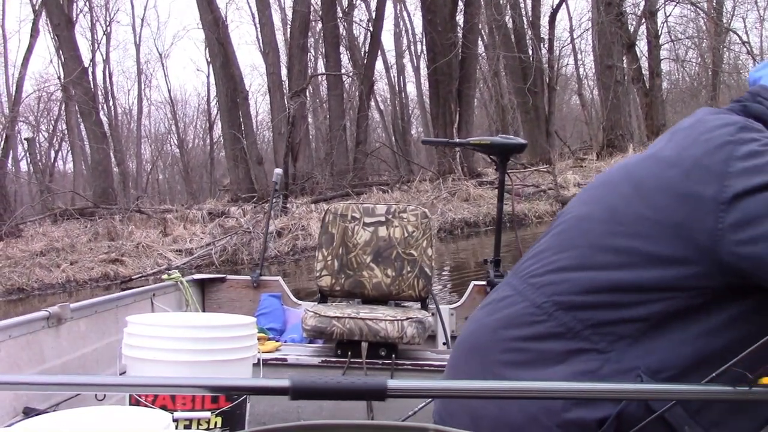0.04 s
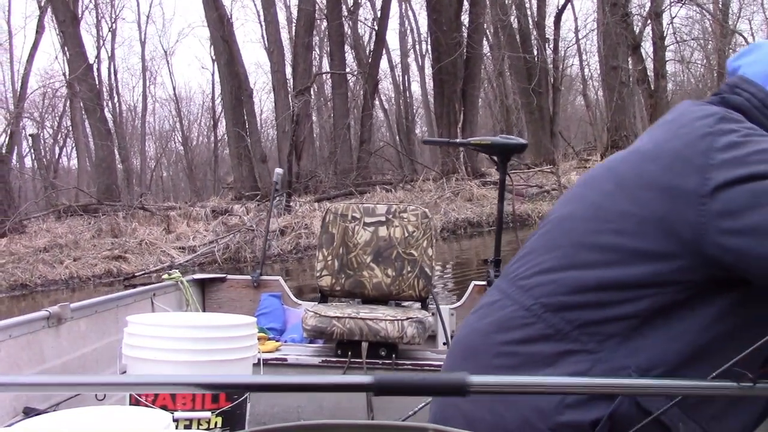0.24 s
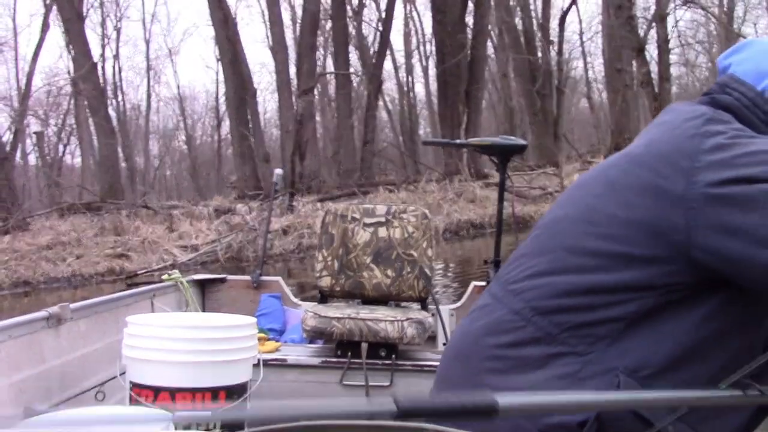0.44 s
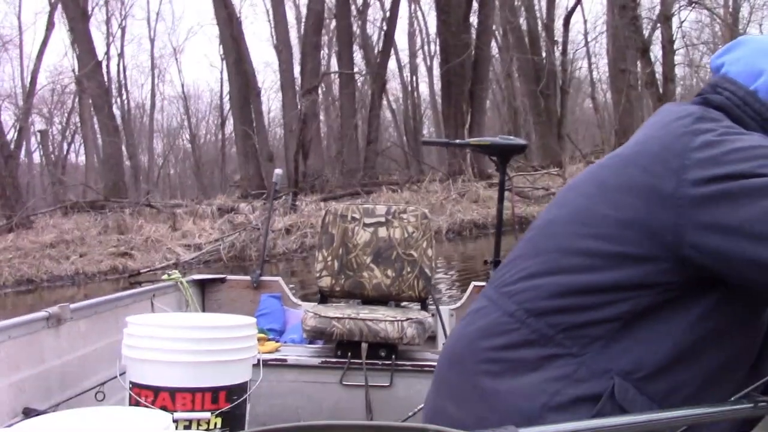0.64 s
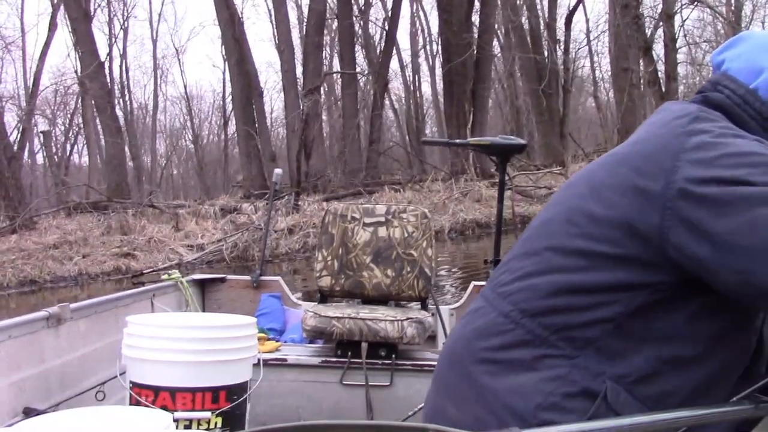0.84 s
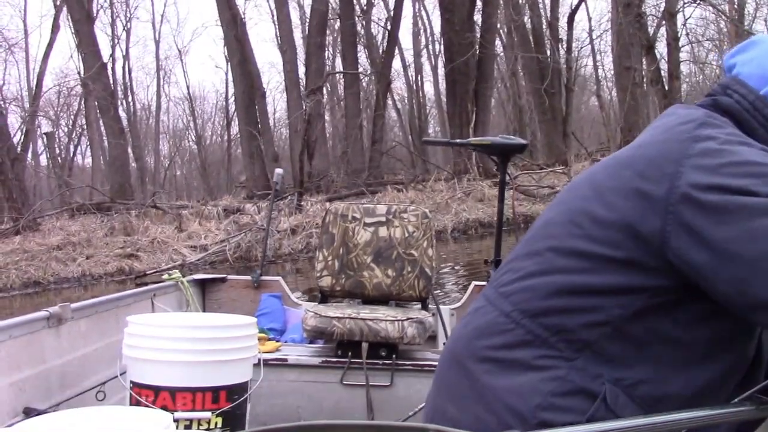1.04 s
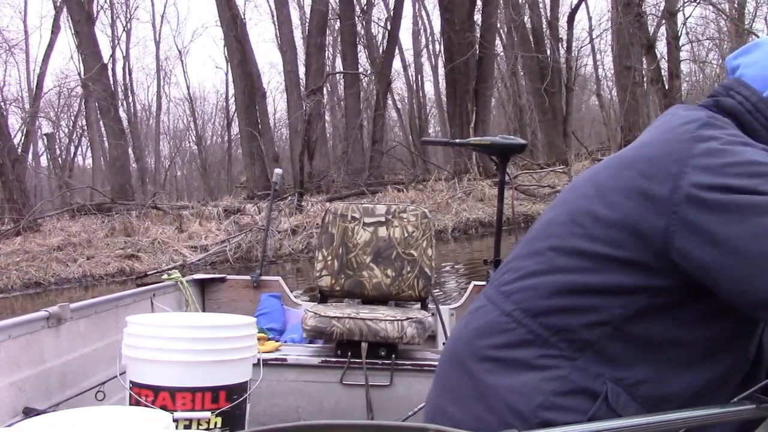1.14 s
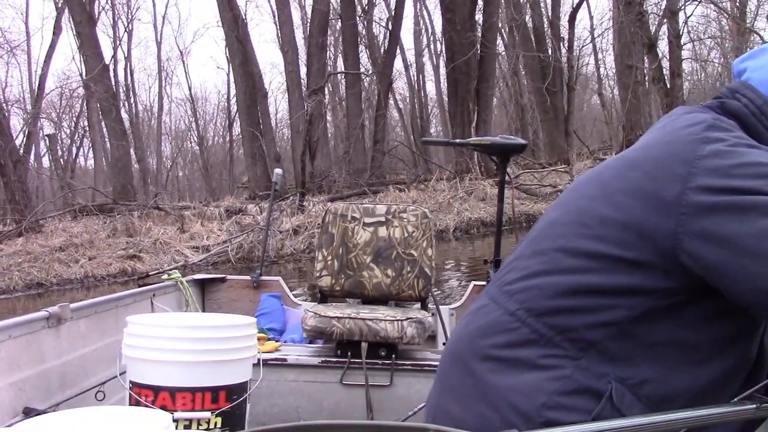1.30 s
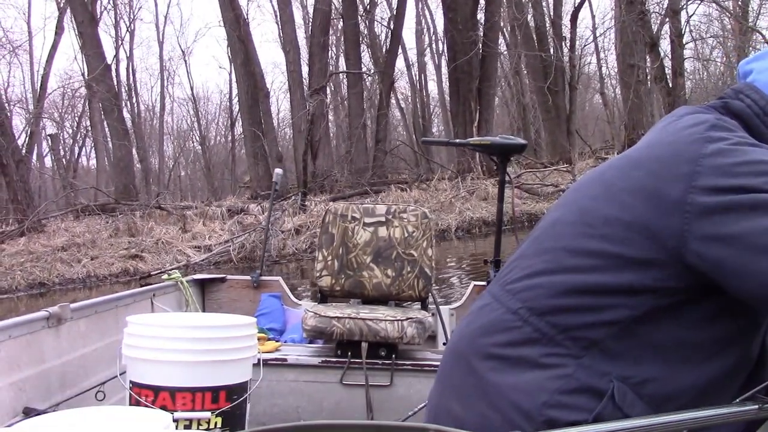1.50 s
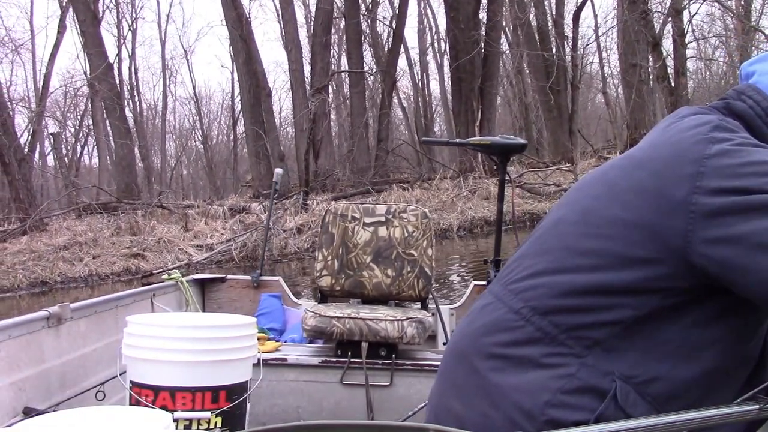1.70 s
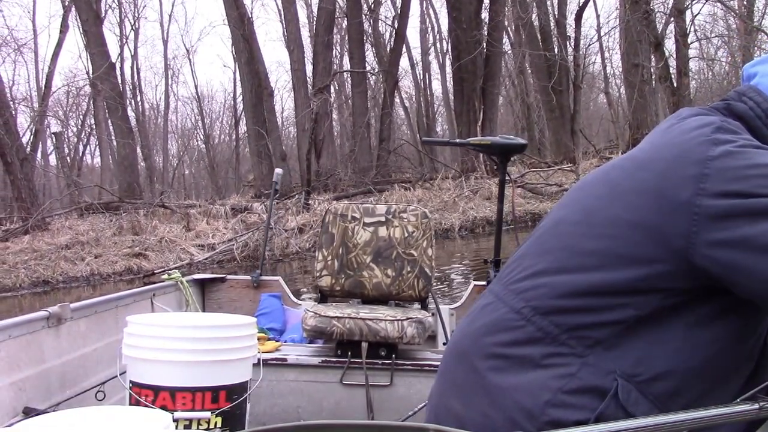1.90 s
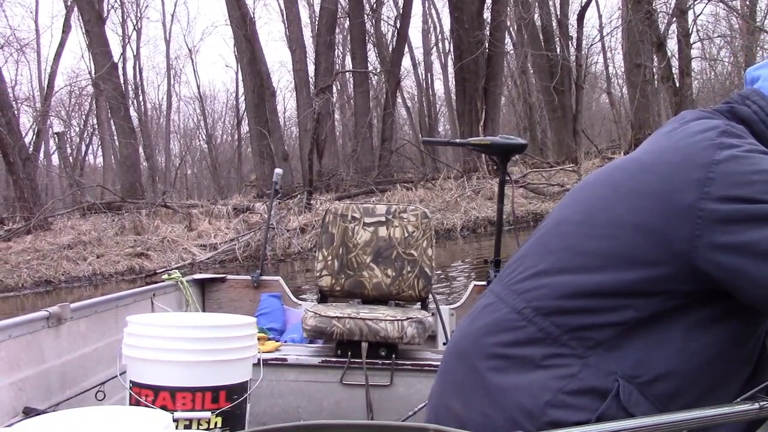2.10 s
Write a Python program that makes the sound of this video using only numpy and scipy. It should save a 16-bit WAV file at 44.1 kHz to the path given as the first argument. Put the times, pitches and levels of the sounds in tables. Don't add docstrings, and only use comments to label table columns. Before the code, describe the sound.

Loud hollow knocks and booming clunks as gear is dragged and dropped in an aluminum boat

```python
import sys
import numpy as np
from scipy import signal
from scipy.fft import rfft, irfft, next_fast_len
from scipy.io import wavfile
from scipy.ndimage import uniform_filter1d, minimum_filter1d

SR = 44100
rng = np.random.default_rng(int(sys.argv[2]) if len(sys.argv) > 2 else 0)


def store_wav(level_fs):
    pcm = np.round(np.clip(np.atleast_2d(level_fs), -1, 1) * 32767)
    wavfile.write(sys.argv[1], SR, pcm.T.astype(np.int16))


def volts(x):
    e = np.asarray(x, float) / 20
    return 10 ** e


N = 94815


def curve(table, hz):
    table = np.array(table, float)
    return np.interp(np.log(np.maximum(hz, 1)), np.log(table[:, 0]), table[:, 1])


def colour(x, table, lo_hz=0, hi_hz=SR):
    n = next_fast_len(len(x), real=True)
    hz = np.arange(n // 2 + 1) * SR / n
    gain = volts(curve(table, hz)) * (hz >= lo_hz) * (hz < hi_hz)
    return irfft(rfft(x, n) * gain, n)[:len(x)]


def unit(x):
    return x / np.sqrt(np.mean(x ** 2))


def grit(grit_db):
    grain = np.repeat(rng.exponential(size=N // 40 + 1), 40)[:N]
    return rng.standard_normal(N) * volts(grit_db * grain)


def strike(times_s, level_db, modes, rise_s, scatter_db, tilt_db=0, loose=1):
    hz, db, t60_s = np.array(modes, float).T
    luck = rng.random((len(times_s), 2, len(hz)))
    tilt = np.reshape(tilt_db, (-1, 1)) * np.log2(hz / 500)
    shape = volts(db + tilt + scatter_db * 3.1 * (luck[:, 0] - .5))
    shape *= (volts(level_db) / np.sqrt(np.sum(shape ** 2, axis=1) / 2))[:, None]
    phase = 2 * np.pi * loose * luck[:, 1]
    age_s = np.arange(int(SR * min(max(t60_s), 1))) / SR
    turn = 2 * np.pi * np.outer(hz, age_s)
    fade = np.exp(-np.log(1000) * np.outer(1 / t60_s, age_s))
    rings = (shape * np.cos(phase)) @ (fade * np.sin(turn))
    rings += (shape * np.sin(phase)) @ (fade * np.cos(turn))
    rings *= 1 - np.exp(-age_s / rise_s)
    out = np.zeros(N + len(age_s))
    for s, ring in zip(times_s, rings):
        start = int(s * SR)
        out[start:start + len(age_s)] += ring
    return out[:N]


def bursts(times_s, level_db, t60_s, table, rise_s, tilt_db, fades=0.34):
    noise = unit(colour(grit(0.76), table))
    age_s = np.arange(SR // 5) / SR
    rise = 1 - np.exp(-age_s / rise_s)
    out = np.zeros(N)
    for lo_hz in 500 * 2 ** (np.arange(11) / 2):
        power = np.zeros(N + len(age_s))
        band_db = level_db + tilt_db * np.log2(lo_hz / 2000)
        for s, db, t60 in zip(times_s, band_db, t60_s):
            start = int(s * SR)
            fall_db = 60 * age_s / t60 * (lo_hz / 2000) ** fades
            power[start:start + len(age_s)] += volts(2 * (db - fall_db)) * rise ** 2
        band = colour(noise, [(1, 0.0044), (2, 0)], lo_hz * (lo_hz > 500), np.sqrt(2) * lo_hz)
        out += np.sqrt(power[:N]) * band
    return out


def friction(table, spectrum, gain_db, grit_db):
    s, db = np.array(table, float).T
    level_db = np.interp(np.arange(N) / SR, s, db, left=-120, right=-120)
    return unit(colour(grit(grit_db), spectrum)) * volts(gain_db + level_db)


# frequency in Hz, level in dB.
WOOD_COLOUR = [(18, -52), (30, -34), (86, 1.5), (728, -5.5), (1690, -15.5), (2870, -15.5), (3360, -21.5),
               (11300, -33.5), (16300, -43)]


def wood():
    out = np.zeros((2, N))
    for lo_hz in 25 * 2. ** np.arange(10):
        mid, side = (colour(rng.standard_normal(N), WOOD_COLOUR, lo_hz, 2 * lo_hz) for _ in range(2))
        swell = unit(uniform_filter1d(rng.standard_normal(N), size=3000))
        width = min(0.2 + lo_hz / 4000, .9)
        out += volts(0.67 * swell) * (mid + width * side * np.array([[1], [-1]]))
    return unit(out) * volts(-53)


# start in seconds, length in seconds, first Hz, last Hz, level in dB.
BIRD_NOTES = [(.99, 0.083, 2200, 2170, -60), (1.35, 0.2, 625, 602, -58.5), (1.36, .02, 1880, 1940, -60),
              (1.378, 0.013, 2050, 2340, -57.5), (1.395, .05, 2730, 2850, -66),
              (1.44, 0.048, 2880, 2900, -67), (1.445, 0.028, 2430, 2450, -60),
              (1.485, 0.019, 2760, 2590, -54.5), (1.5, .015, 2550, 2300, -58),
              (1.505, 0.038, 2140, 2240, -56.5), (1.5, 0.048, 2890, 2920, -58.5),
              (1.525, 0.019, 2770, 2690, -54.5), (1.54, 0.075, 2370, 2436, -58), (1.6, .2, 2355, 2244, -68),
              (1.54, 0.13, 2830, 2840, -64.5), (1.62, 0.12, 2900, 2850, -63), (1.71, 0.12, 2850, 2870, -73),
              (1.945, .04, 2920, 2540, -63.5), (1.98, .11, 2480, 2520, -63),
              (2.095, 0.054, 2360, 2410, -56), (1.9, 0.18, 399.8, 394, -58)]
WHINE_SWELL_S = [.95, 1.35]


def birds():
    whine_hz, whine_db, overtone_db = 5570, -72.5, -11
    chirps_per_s, chirp_start_s = 7.7, 1.3
    t = np.arange(N) / SR
    waver = unit(uniform_filter1d(rng.standard_normal((2, N)), size=300))
    turn = 2 * np.pi * whine_hz * t + waver[1] / 2
    gate = np.clip(.5 + 2 * np.sin(2 * np.pi * chirps_per_s * (t - chirp_start_s)), 0, 1)
    gate *= np.interp(t, WHINE_SWELL_S, [0, 1])
    out = volts(whine_db + 2 * waver[0]) * gate * (np.sin(turn) + volts(overtone_db) * np.sin(2 * turn))
    for s, length_s, hz0, hz1, db in BIRD_NOTES:
        i = np.arange(int(s * SR), min(int((s + length_s) * SR), N))
        u = (i / SR - s) / length_s
        hz = (hz0 + (hz1 - hz0) * u) * (1 + 0.004 * waver[1, i])
        swell = np.abs(np.sin(np.pi * u)) ** 0.35
        out[i] += volts(db + 2.0 + 1.9 * waver[0, i]) * swell * np.sin(2 * np.pi * np.cumsum(hz) / SR)
    return out


# time in seconds, level in dB.
RUSTLE = [(.74, -90), (.78, -60), (.88, -67), (1.0, -73), (1.14, -64.5), (1.28, -71), (1.5, -73),
          (1.8, -78), (1.87, -67), (2.03, -67.5), (2.07, -60.5), (2.15, -69)]


def jacket():
    cloth = [(1500, -30), (2500, 5), (6000, 6), (8000, 5.5), (10000, -1), (14000, -33)]  # Hz, dB
    return friction(RUSTLE, cloth, 0, 1.3)


# time in seconds, level in dB.
ROCKING = [
    (1.0, -78),
    (1.08, -43),
    (1.25, -43.5),
    (1.45, -52),
    (1.62, -47),
    (1.75, -64),
]


def rocking():
    slosh = [(60, -13.0), (130, 5.5), (220, -4.0), (700, -14.0), (2000, -98.5)]  # Hz, dB
    return friction(ROCKING, slosh, 0, 0.54)


# time in seconds, level in dB.
DRAG = [(0, -55), (.095, -48), (.105, -45.5), (.17, -45), (.19, -40), (.21, -36.5), (.24, -38.5),
        (.27, -35), (.3, -42.5), (.34, -42), (.45, -54), (.56, -61.5)]
# frequency in Hz, level in dB.
SCRAPE_COLOUR = [(35, -32), (60, -4), (233, -0.5), (1860, -24), (8120, -35.5), (13000, -47), (16000, -57)]
# frequency in Hz, width in Hz, boost in dB.
POLE_MODES = [(476, 43, -6), (705, 135, 5), (1020, 37, 3), (1880, 27, 15), (2050, 43, -1), (2790, 80, 5),
              (3710, 44, -3), (5130, 220, 2.5), (5970, 120, 7), (6600, 150, 6.5), (8900, 880, -4)]


def drag():
    scrape = friction(DRAG, SCRAPE_COLOUR, 11.5, 1.0)
    out = scrape.copy()
    for hz, width_hz, db in POLE_MODES:
        b, a = signal.iirpeak(hz, hz / width_hz, fs=SR)
        out += volts(db) * signal.lfilter(b, a, scrape)
    return out


# start in seconds, level in dB, brightness in dB per octave.
TICKS = [(0.813, -30, -1), (0.897, -43, -1.5), (0.962, -28.5, 1), (1.046, -41.5, 1), (1.1123, -37.5, 0),
         (1.193, -43, -0.5), (1.2917, -54, -2), (1.348, -44.5, 0), (1.428, -44.5, 2), (1.5593, -42.5, 4),
         (1.5786, -43, 1.5), (1.6804, -57, 12), (1.7335, -49, -1), (1.8145, -53.5, -1), (1.894, -52, 8),
         (2.0535, -55, 0)]
# frequency in Hz, level in dB per Hz.
TICK_COLOUR = [(500, -23), (1000, 0), (1400, -4), (2400, -6.5), (3000, -20.5), (6000, -29), (9000, -36),
               (13000, -73)]


def rod():
    s, db, bright_db = np.array(TICKS, float).T
    return bursts(s, db, 0.058 + 0 * s, TICK_COLOUR, 0.0021, bright_db)


# start in seconds, level in dB, noise t60 in seconds, ring in dB,
# brightness in dB per octave.
CLINKS = [
    (0.6471, -28, 0.067, -9, 8.5),
    (.657, -8, 0.081, -15, 0),
    (0.6837, -18, 0.065, -22, 1.5),
    (0.723, -42, 0.19, -25, 2.5),
    (0.7338, -15.5, 0.078, -17, -0.5),
]
# frequency in Hz, level in dB per Hz.
CLINK_COLOUR = [(710, -8.5), (1200, -6.5), (3290, -6.5), (3620, -1.5), (3910, -6), (8000, -15.5),
                (9930, -13), (13000, -16.5), (16000, -53)]
# frequency in Hz, level in dB, t60 in seconds.
CLINK_RING = [(8500, -2, .1), (9670, -6, .085)]


def fitting():
    s, db, t60_s, ring_db, bright_db = np.array(CLINKS, float).T
    hz = 1500 * 6.5 ** ((np.arange(50) + rng.random(50)) / 50)
    jingle = np.c_[hz, curve(CLINK_COLOUR, hz) + 3 * np.log2(hz), 0.028 + 0 * hz]
    out = bursts(s, db, t60_s, CLINK_COLOUR, 0.0022, bright_db, .55)
    out += strike(s, db + ring_db, CLINK_RING, .0005, 0.86)
    return out + strike(s, db - 2.5, jingle, 0.00022, 2.8, bright_db)


KNOCK_S = [.2015, .321, .585, .9375, 1.0865]
# level in dB, hardness in dB per octave, t60 scale.
KNOCKS = [
    (-4, 7.5, 0.85),
    (-2, 0, 0.85),
    (-5, -14, 1.1),
    (-22, 5, 0.85),
    (-20, -5, 0.37),
]
# frequency in Hz, level in dB, t60 in seconds.
OBJECT_MODES = [(374, -6, 0.13), (484, 1.5, 0.065), (567, -4.5, 0.1), (684, 3, 0.055), (781, -1.5, 0.072),
                (980, -13, .05)]
THUD_S = [.94, .961]
THUD_DB = [-15, -14.5]
# frequency in Hz, level in dB, t60 in seconds.
THUD_MODES = [(132.5, 4.5, 0.25), (149.7, -4, 0.29)]


def knocks():
    out = strike(THUD_S, np.array(THUD_DB), THUD_MODES, 0.004, 0, loose=0)
    for s, (db, hard_db, scale) in zip(KNOCK_S, KNOCKS):
        modes = np.array(OBJECT_MODES) * [1, 1, scale]
        out += strike([s], np.array([db]), modes, 0.0013, 0, hard_db, loose=0)
    return out


# start in seconds, panel level in dB, boom level in dB,
# hardness in dB per octave.
BLOWS = [(0.201, -8.5, -26.5, 4), (0.233, -8.5, -46, 4), (0.322, -1, -16.5, 2), (0.347, -2.5, -12.5, -8.5),
         (0.377, -2.5, -12, -1), (0.401, -8.5, -15, -3.5), (0.46, -15.5, -13.5, -1.5),
         (.482, -20.5, -19.5, -13), (0.583, 0.5, -8, 2.5), (0.618, -0.5, -12, -15), (0.636, -10, -15, 0),
         (0.656, -11, -12, -14), (0.674, -9, -17.5, 10), (0.74, -11.5, -17, 1), (0.862, -30.5, -26.5, -9),
         (0.936, -16.5, -28.5, -9), (1.087, -19.5, -32.5, -8.5), (1.123, -42, -31, -15)]
# frequency in Hz, level in dB, t60 in seconds.
BOOM_MODES = [(91.6, -16, 0.92), (135.5, -3.5, 0.32), (148.1, 1.5, 0.4), (165.3, -7.5, 0.81),
              (201.7, -6, 0.7), (219.1, -8.5, 0.83), (234.6, -1, 0.41), (256, -4, 0.18), (300.4, -9, .3)]
# frequency in Hz, level in dB.
PANEL_LEVEL = [(160, -29), (280, -11), (494, -1), (833, -11), (904, -12), (1060, -16.5), (2500, -39.5),
               (3250, -68), (5500, -120)]
# frequency in Hz, t60 in seconds.
PANEL_T60 = [(300, 0.39), (600, 0.33), (1000, 0.3), (2500, 0.48)]
# start in seconds, level in dB, t60 in seconds, brightness in dB per octave.
CLACKS = [(0.0273, -33, 0.057, 1), (.0365, -41, 0.049, 2), (0.1026, -32.5, 0.46, -5), (0.2015, -7, 0.15, 2),
          (0.2133, -13, 0.059, 1.5), (0.2324, -23, 0.27, 5), (0.32, -23, 0.36, -6.5),
          (.329, -34, 0.085, 3.5), (0.3425, -22.5, 0.15, 2.5), (0.39, -29, 0.14, 0.5),
          (0.4575, -27.5, 0.12, -2.5), (0.5825, -9.5, 0.13, -2), (0.613, -24, 0.43, -3),
          (0.864, -43, 0.17, -2), (0.9325, -30.5, 0.12, -2)]
# frequency in Hz, level in dB per Hz.
CLACK_COLOUR = [(590, -47), (1000, -7), (1400, -4), (1850, -2), (4790, -16.5), (5830, -12), (12800, -32),
                (16000, -51)]


def hull():
    s, panel_db, boom_db, hard_db = np.array(BLOWS, float).T
    hz = 270 + 2000 * ((np.arange(160) + rng.random(160)) / 160) ** 1.5
    t60_s = curve(PANEL_T60, hz) * rng.uniform(.7, 1.2, size=160)
    thicket = np.c_[hz, curve(PANEL_LEVEL, hz), t60_s]
    out = strike(s, boom_db + 0.5, BOOM_MODES, 0.0017, 3)
    out += strike(s, panel_db - 8, thicket, 0.00098, 5.5, np.clip(hard_db, -7, 7))
    s, db, t60_s, bright_db = np.array(CLACKS, float).T
    return out + bursts(s, db - 7, t60_s, CLACK_COLOUR, 0.00082, bright_db)


# frequency in Hz, side relative to mid in dB.
SIDE_DB = [(60, -21.5), (500, -22), (3000, -18.5), (8000, -14), (13000, -13)]


def scene():
    fitting_left_db, left_db = -0.5, 1.04
    clinks = fitting()
    mid = birds() + jacket() + rocking() + drag() + rod() + clinks + knocks() + hull()
    spread = rng.standard_normal(3000) * np.exp(-np.arange(3000) / 700)
    spread /= np.sqrt(np.sum(spread ** 2))
    side = colour(signal.fftconvolve(mid, spread)[:N], SIDE_DB)
    side += clinks * (volts(fitting_left_db) - 1) / (volts(fitting_left_db) + 1)
    stereo = np.array([mid + side, mid - side]) + wood()
    return stereo * volts(left_db / 2 * np.array([[1], [-1]]))


def roll_off(x):
    return signal.sosfilt(signal.butter(12, 16470, fs=SR, output="sos"), x)


def record(dry):
    ceiling, ratio, release_s = 0.99, 5.4, 0.016
    x = signal.sosfilt(signal.butter(3, 75, "high", fs=SR, output="sos"), dry)
    peak = -minimum_filter1d(-np.abs(x).max(axis=0), size=300)
    cut = np.log(np.minimum(1, ceiling / (peak + 1e-9))) * (1 - 1 / ratio)
    hold = np.exp(-1 / (release_s * SR))
    released = signal.lfilter([1 - hold], [1, -hold], cut)
    cut = np.minimum(uniform_filter1d(cut, size=150), released)
    x = np.clip(x * np.exp(cut), -.95, .95)
    mix = signal.sosfilt(signal.ellip(8, .5, 60, 16200, fs=SR, output="sos"), x)
    return roll_off(mix)


dry = scene()
out = record(dry)
store_wav(out)
```